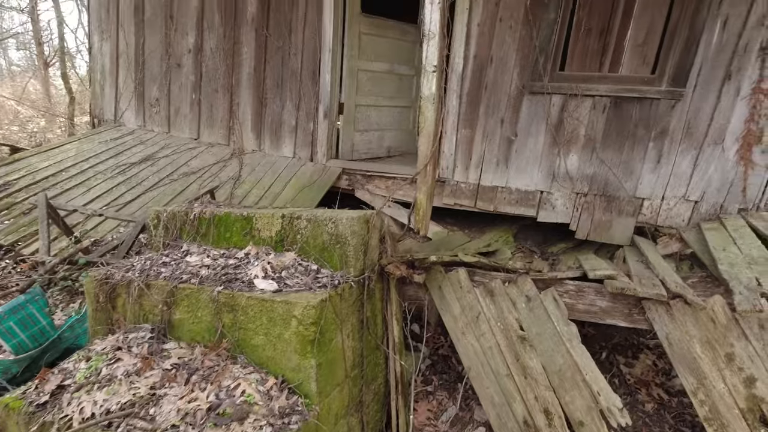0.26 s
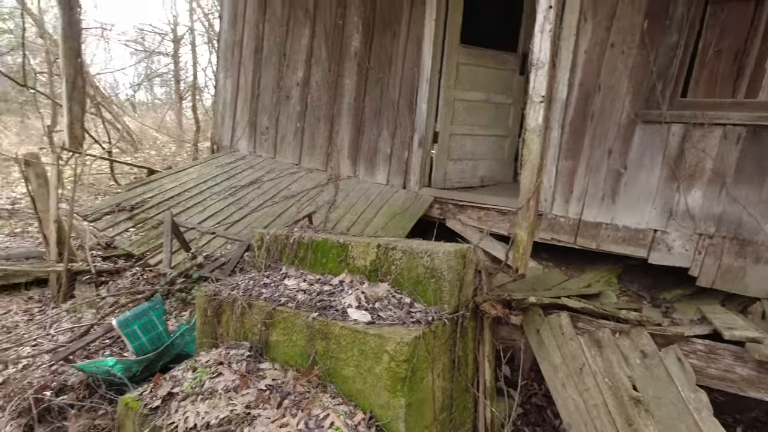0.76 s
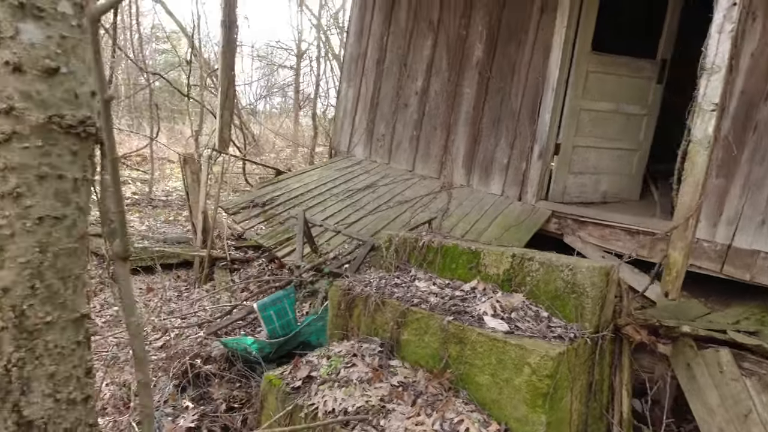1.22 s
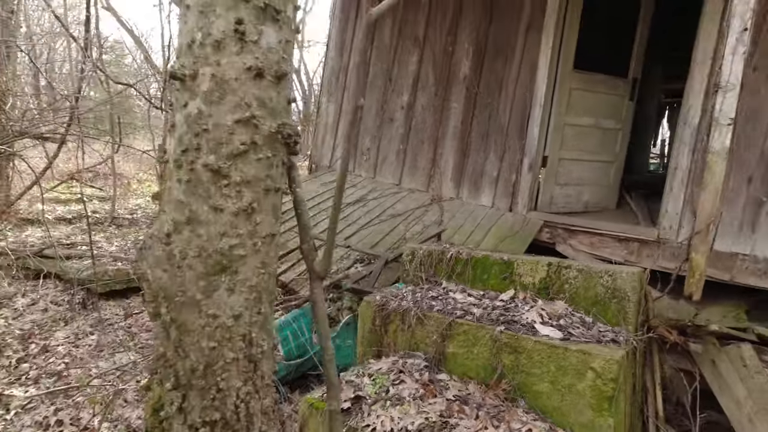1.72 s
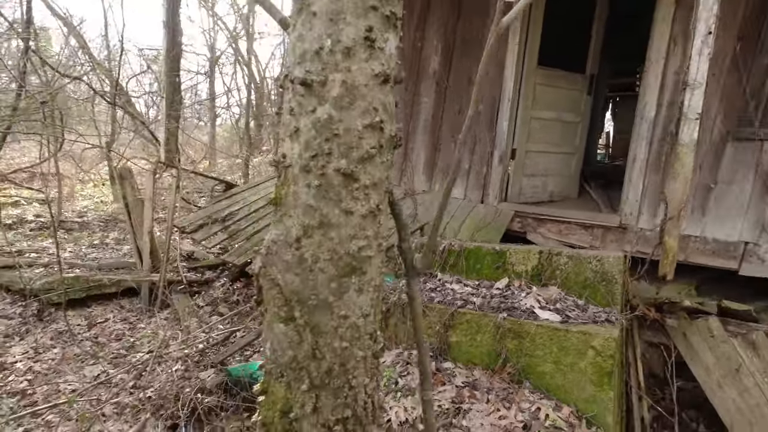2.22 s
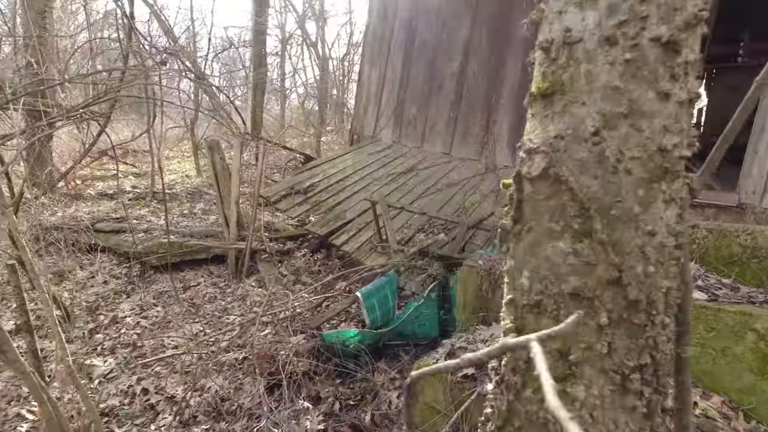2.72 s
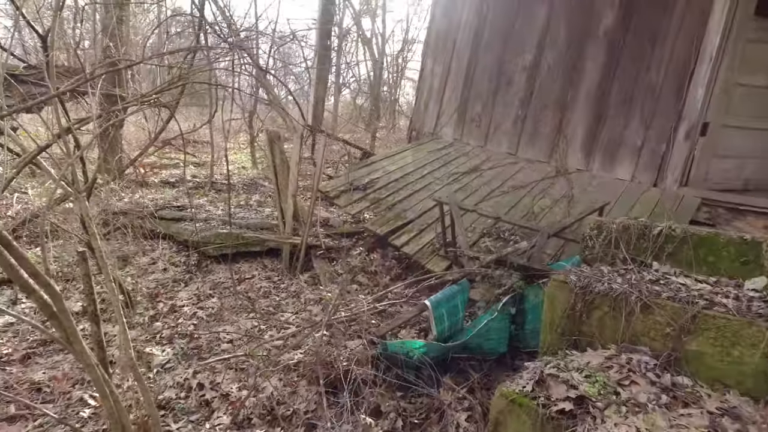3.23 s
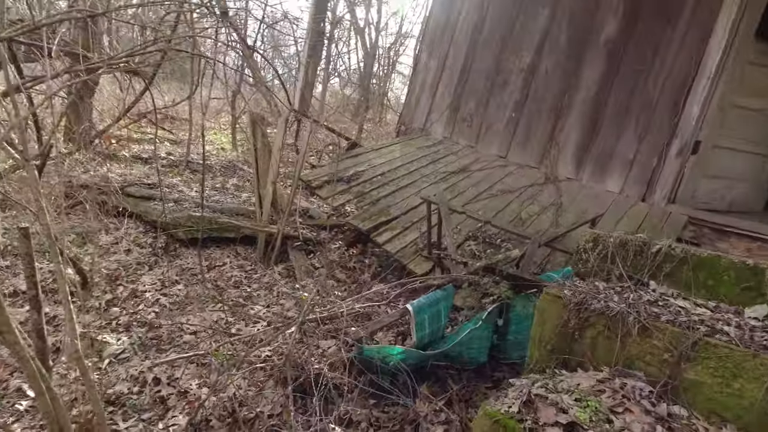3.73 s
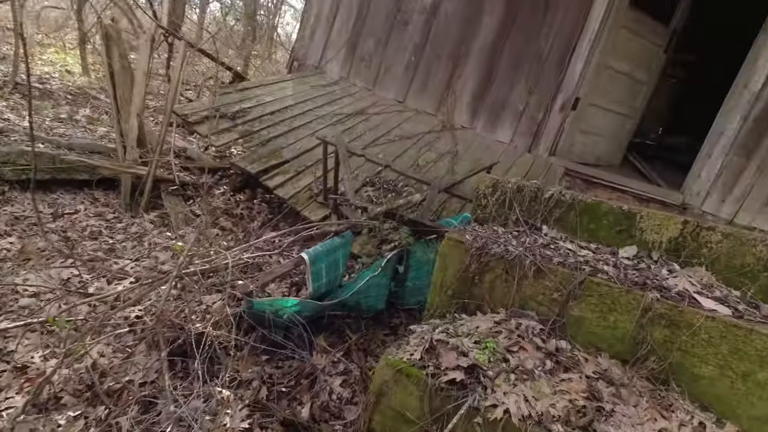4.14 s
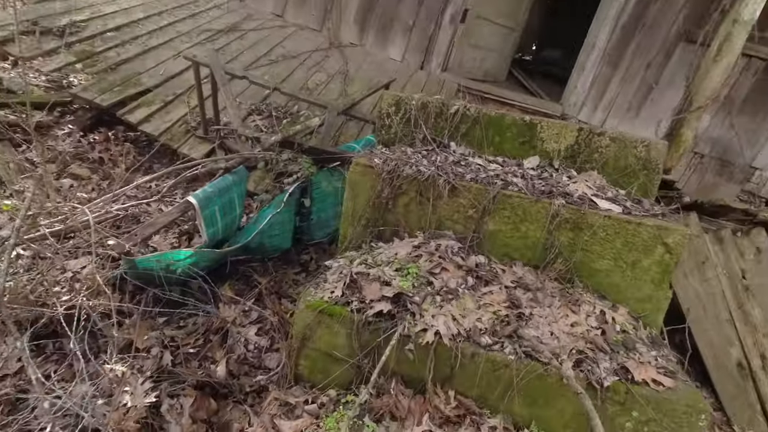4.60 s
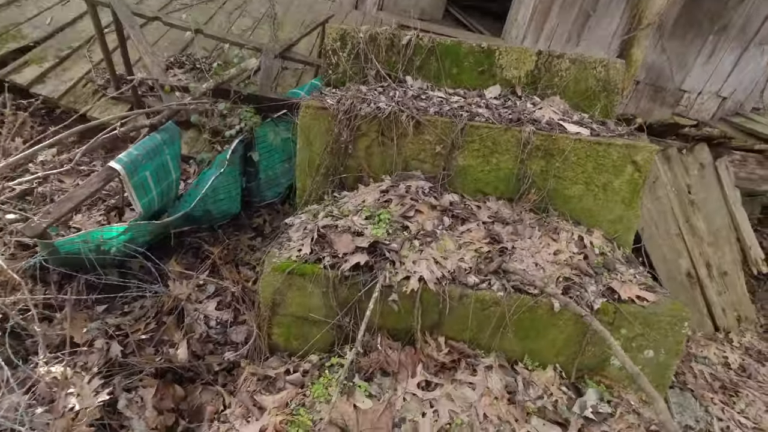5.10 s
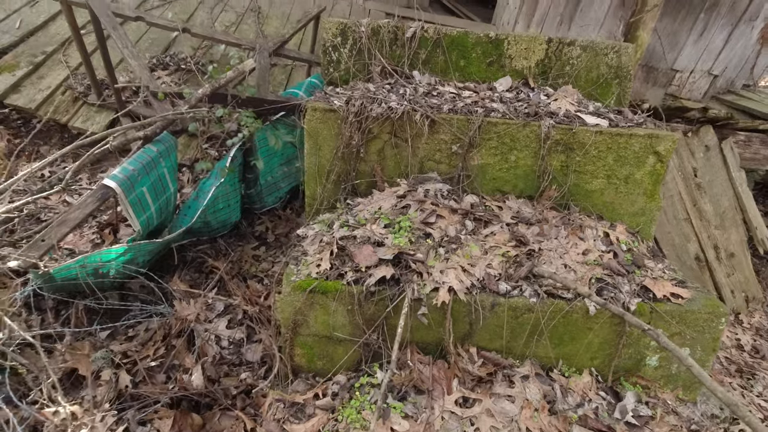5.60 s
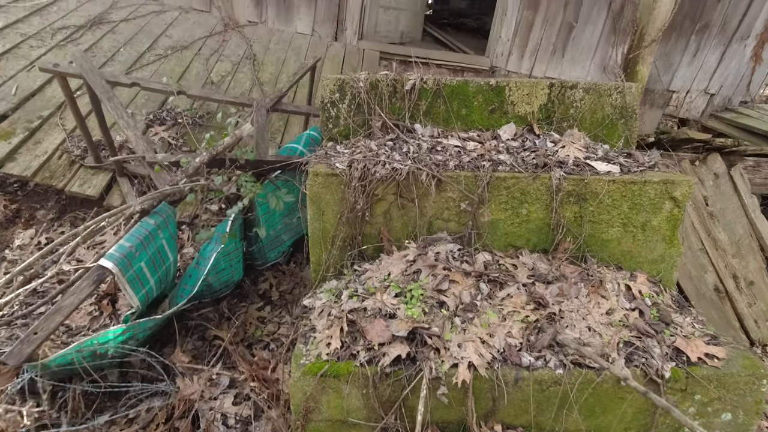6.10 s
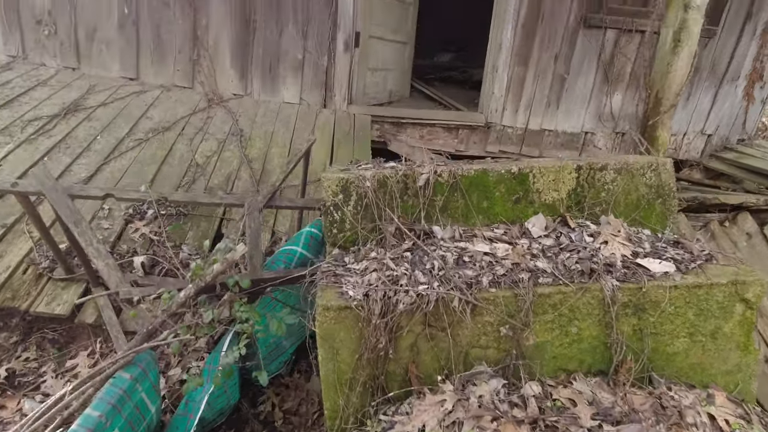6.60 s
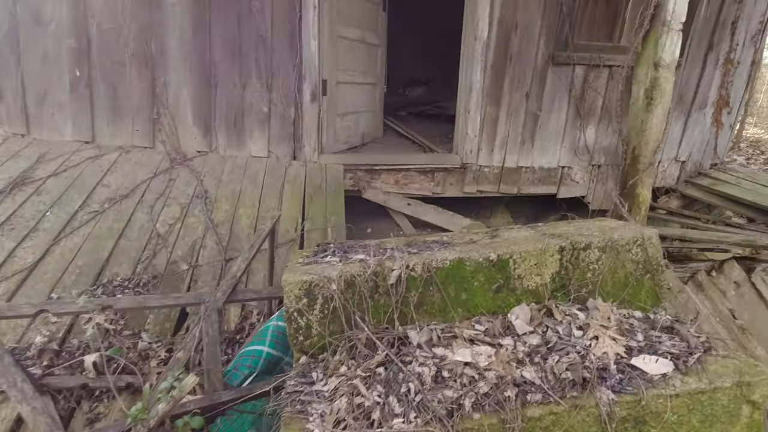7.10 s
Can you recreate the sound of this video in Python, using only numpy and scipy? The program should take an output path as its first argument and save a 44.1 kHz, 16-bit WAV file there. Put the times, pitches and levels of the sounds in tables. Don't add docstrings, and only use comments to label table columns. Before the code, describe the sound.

Footsteps crunch through dry leaves and snap twigs in a bare wood, a distant low engine drone fading, with bumps on the handheld microphone.

```python
import sys
import numpy as np
from scipy import signal
from scipy.io import wavfile
from scipy.ndimage import uniform_filter1d

SR = 44100
rng = np.random.default_rng(int(sys.argv[2]) if len(sys.argv) > 2 else 0)


def voltage_ratio(level):
    return 10 ** (np.asarray(level, float) / 20)


def int16_out(signal):
    q = np.round(np.clip(np.atleast_2d(signal).T, -1, 1) * 32767)
    wavfile.write(sys.argv[1], SR, q.astype(np.int16))


N = 324135

# frequency_hz, density_db (dB per Hz)
LEAF_SPECTRUM = [(200, -23), (350, -3.5), (600, -10), (1000, -4.5), (2000, -4.5), (4500, -5.5),
                 (6800, -2.5), (8500, -11.5), (12500, -23), (16000, -26.5)]


def evened(x):
    return x / np.sqrt(np.mean(x ** 2) + 1e-20)


def peak_one(x):
    return x / abs(x).max()


def column(rows, count):
    rows = np.array(rows)
    return np.interp(np.arange(N) / SR, rows[:, 0], rows[:, count])


def coloured(x, points):
    f, db = np.transpose(points)
    hz = abs(np.fft.fftfreq(4096, 1 / SR))
    log_gain = np.log(voltage_ratio(np.interp(np.log(hz + 1), np.log(f + 1), db)))
    taps = np.fft.ifft(np.exp(np.conj(signal.hilbert(log_gain)))).real
    if abs(taps[:64]).sum() <= abs(taps[-64:]).sum():
        taps = np.roll(taps[::-1], 1)
    return signal.oaconvolve(x, taps[:2048])[:len(x)]


def band(x, lo_hz, hi_hz):
    hi_hz = max(min(hi_hz, .45 * SR), 1.1 * lo_hz)
    return signal.sosfilt(signal.butter(2, [lo_hz, hi_hz], "band", fs=SR, output="sos"), x)


def drift(rate_hz):
    noise = rng.standard_normal(N + 2 * SR)
    return evened(signal.sosfilt(signal.butter(2, rate_hz, fs=SR, output="sos"), noise)[-N:])


def add(mix, s, sound):
    part = mix[round(s * SR):][:len(sound)]
    part += sound[:len(part)]


def patchy(x, depth_db, size=(14, 5)):
    z = signal.stft(x, nperseg=512, noverlap=384)[2]
    field = rng.standard_normal(z.shape[::-1])
    field = uniform_filter1d(field, size=size[0], axis=0)
    field = evened(uniform_filter1d(field, size=size[1], axis=1))
    return signal.istft(z * voltage_ratio(depth_db * field.T), nperseg=512, noverlap=384)[1][:len(x)]


def tent(s, db, rise_s, fall_s, hold_s=0):
    span_db = 20
    t = np.arange(0, N + 16, 16) / SR - s
    rising = t / max(rise_s, 1e-3)
    falling = (hold_s - t) / max(fall_s, 1e-3)
    return voltage_ratio(db + span_db * np.minimum(np.minimum(rising, falling), 0)) ** 2


def gain(power):
    return np.interp(np.arange(N) / 16, np.arange(len(power)), np.sqrt(power))


def engine(waver_db=3.5, weak_db=3):
    # start_s, fifth_db, eighth_db
    main_orders = [(0, -46.5, -62), (.5, -53, -54), (.95, -50, -69.5), (1.33, -47, -58.5),
                   (1.75, -42, -60.5), (2.1, -50, -63), (2.75, -42, -54.5), (3.15, -50, -64.5),
                   (3.5, -56.5, -59), (4.0, -49, -74), (4.25, -61, -60), (4.58, -64, -65), (5.0, -56, -62),
                   (5.8, -63, -59), (6.1, -64, -68.5), (6.45, -67, -54.5), (6.65, -63.5, -64.5),
                   (7.35, -62, -61.5)]
    # start_s, tenth_db, fifteenth_db
    overtones = [(0, -58, -70), (.7, -59, -74), (1.3, -68, -72), (2.2, -67, -76), (2.7, -62, -70),
                 (3.5, -72, -76), (4.1, -74, -72), (4.5, -72, -64), (5.0, -64, -76), (5.6, -65, -80),
                 (6.0, -76, -76), (6.7, -70, -72), (7.0, -66, -78), (7.35, -65, -64)]
    weak_orders = {3: -17.5, 4: -12, 6: -8.5, 7: -11, 13: -16.5}
    # frequency_hz, density_db (dB per Hz)
    air = [(30, -15), (60, -2), (150, -5.5), (230, -7.5), (400, -13.5), (800, -9.5), (1300, -14.5),
           (2200, -23), (4000, -35.5), (6500, -46), (9000, -47), (13000, -50), (14500, -76)]
    shaft_hz = 14.87
    near_db, far_db, fade_s = -54.5, -70.5, 3.93
    turn = 2 * np.pi * np.cumsum(shaft_hz * (1 + 0.00395 * drift(0.48))) / SR

    def order(k, blur=.63):
        phase = k * turn + 2 * np.pi * rng.random() + blur * drift(3.5)
        return np.sqrt(2) * np.sin(phase)

    fifth, eighth = voltage_ratio(column(main_orders, count=1)), voltage_ratio(column(main_orders, count=2))
    strong = fifth * order(5, blur=.3) + eighth * order(8, blur=.45)
    weak = sum(voltage_ratio(db + weak_db + waver_db * drift(1.22)) * order(round(k))
               for k, db in weak_orders.items())
    upper = voltage_ratio(column(overtones, count=1)) * order(10, blur=.5)
    upper += voltage_ratio(column(overtones, count=2)) * order(15, blur=.5)
    roar = patchy(coloured(rng.standard_normal(N), air), 1.46)
    fading_db = far_db + (near_db - far_db) * np.exp(-np.arange(N) / SR / fade_s)
    roar *= voltage_ratio(fading_db + .8 * drift(4)) / np.std(band(roar, 500, 1400))
    return strong + upper + fifth ** 0.31 * eighth ** 0.74 * weak + roar


def push():
    # start_s, hold_s, level_db, swing_hz
    jolts = [(0, 0.07, -43, 17), (.105, .08, -33, 11), (0.45, 0.045, -39, 16), (1.33, 0.19, -28, 9.8),
             (1.572, .09, -31, 10.5), (1.797, 0.21, -30, 9.4), (2.1, 0.36, -47, 30), (2.508, .13, -26, 10),
             (2.665, .07, -32, 13), (3.205, 0.25, -33, 8.3), (3.56, 0.28, -45, 8.2), (4.215, .05, -42, 14),
             (4.902, .15, -58, 12), (5.113, 0.075, -35, 10.5), (6.83, .07, -44, 10.5)]
    rise_s, fall_s = 0.028, 0.06
    calm_db, lumps_db, lead_cycles = -68, -11, .2
    lumps = band(band(rng.standard_normal(N), 14, 36), 10, 42)
    lumps /= np.sqrt(uniform_filter1d(lumps ** 2, size=7000) + 1e-12)
    t = np.arange(N) / SR
    powers = [tent(s + rise_s / 2, db, rise_s, fall_s, hold) for s, hold, db, hz in jolts]
    swing = np.zeros(N)
    for power, (s, hold, db, hz) in zip(powers, jolts):
        swing -= np.sqrt(2) * gain(power) * np.sin(2 * np.pi * (hz * (t - s) + lead_cycles))
    return swing + gain(voltage_ratio(lumps_db) ** 2 * sum(powers) + voltage_ratio(calm_db) ** 2) * lumps


def knocks():
    # start_s, peak_db, body_hz, t60_s
    blows = [(3.036, -32.5, 130, 0.045), (3.0588, -23, 180, .05), (3.0707, -16, 157, 0.069),
             (3.0771, -19, 168, 0.054), (3.1025, -12, 59, 0.03), (3.158, -34, 190, 0.04),
             (3.121, -36, 230, .06), (3.131, -37, 264, 0.054), (3.144, -35, 320, .05),
             (4.2445, -21.5, 99, 0.024), (4.242, -30, 335, 0.043), (4.262, -37.5, 231, 0.1),
             (4.075, -40, 296, 0.047), (4.952, -45, 382, 0.047), (5.0, -44, 75, .15), (2.53, -42, 160, .15),
             (2.64, -34, 377, 0.037)]
    # start_s, hold_s, level_db
    drags = [
        (3.033, .001, -46),
        (3.055, 0.025, -32.5),
        (3.104, .003, -35),
        (3.114, .03, -51),
        (3.135, 0.031, -48.5),
        (3.024, .01, -50.5),
    ]
    t, out = np.arange(8000) / SR, np.zeros(N)
    onset = 1 - np.exp(-(t / .002) ** 2)
    for s, db, hz, t60 in blows:
        ring = np.sin(2 * np.pi * hz * t) * voltage_ratio(-60 * t / t60) * onset
        add(out, s, -voltage_ratio(db) * peak_one(ring))
    muffled = [(150, -23), (400, 5.5), (900, -2.5), (1600, -12.5), (2600, -20.5), (5000, -52.0)]
    rub = coloured(rng.standard_normal(N), muffled)
    dragging = sum(tent(s, db, 0.0053, 0.0068, hold) for s, hold, db in drags)
    return out + gain(dragging) * evened(rub)


def twig_rings():
    # start_s, level_db, ring_hz, t60_s
    modes = [(4.9525, -30, 1000, 0.081), (5.4445, -38.5, 1330, 0.06), (.4705, -32, 500, 0.017),
             (4.243, -33, 520, 0.12), (4.0755, -40, 820, 0.044), (2.7337, -22, 810, .022),
             (4.9515, -21, 7900, .03), (4.9525, -25, 2500, .03), (4.478, -33, 5650, .05),
             (4.481, -33, 2620, .04), (4.2415, -25, 3150, .025), (.7068, -30, 1750, .012),
             (.2378, -33, 1900, .012), (6.345, -47, 1050, .08), (3.066, -32, 660, .05),
             (3.104, -34, 740, .04)]
    t, out = np.arange(4000) / SR, np.zeros(N)
    for s, db, hz, t60 in modes:
        add(out, s, voltage_ratio(db - 60 * t / t60) * np.sin(2 * np.pi * hz * t))
    return out


def fracture(hz, wood_db, fizz_db, ms, tone_db, spread, click=3.5):
    wood_hz, wood_ms, debris_db, debris_ms = 950, 1.47, -24, 12
    t = np.arange(4000) / SR
    splinter, thud, bits = rng.standard_normal((3, len(t)))
    ms = np.clip(ms, .3, 20)
    drive = splinter * (1 - np.exp(-t / 0.000067)) * np.exp(-1000 * t / ms)
    drive[4] += click * np.sign(thud[0]) * 2 / ms
    wide = peak_one(band(band(drive, 1430, 7730), 790, 11400))
    ring = peak_one(band(drive, hz / spread, hz * spread))
    crack = peak_one(wide + voltage_ratio(tone_db) * ring)
    fizz = peak_one(band(band(drive, 7160, 13400), 8500, 16700))
    thump = drive + thud * np.exp(-1000 * t / wood_ms)
    wood = peak_one(band(thump, 0.6 * wood_hz, 1.46 * wood_hz))
    debris = evened(coloured(bits * abs(thud), LEAF_SPECTRUM))
    debris *= np.exp(-1000 * t / debris_ms) * (1 - np.exp(-t / 0.00041))
    return crack + voltage_ratio(wood_db) * wood + voltage_ratio(fizz_db) * fizz + voltage_ratio(debris_db) * debris


def snaps():
    # start_s, peak_db, ring_hz, wood_db, length_ms
    twigs = [(.2378, -27, 3400, -4, 1.2), (.3201, -36.5, 6140, -3, 2), (.471, -21.5, 3160, -1, 0.27),
             (0.5635, -28.5, 6540, -8, 1.35), (0.707, -22.5, 3500, -5, 0.29), (1.4873, -39, 4970, 1, 2.8),
             (1.5032, -24, 4060, -7, 1.55), (1.511, -25, 6950, -7.5, 1.6), (1.5957, -27.5, 6100, -4, .79),
             (1.656, -17, 4200, -10.5, 1.44), (1.7847, -24.5, 2550, -8, 1.1), (2.6436, -24, 2850, -6, 1.2),
             (2.7334, -18.5, 4730, -6, 1.8), (2.752, -24.5, 2748, -7, 1.3),
             (3.362, -35.5, 2600, -0.5, 0.98), (3.3843, -33, 2700, -5, 1.6),
             (4.0747, -36.5, 2160, 9.5, 3.1), (4.2412, -19.5, 6200, -9, 2.2), (4.2451, -19.5, 3300, -8, 2),
             (4.2625, -26.5, 2360, -5, 2.9), (4.9547, -21, 2620, -10, 2.6), (4.9971, -30, 2080, -8, 2.6),
             (5.4437, -23.5, 1660, -10.5, 1.56), (6.305, -37, 3970, -1, 1.3)]
    # start_s, peak_db, ring_hz, fizz_db
    ticks = [(0.1079, -28, 6900, -6), (.279, -23, 3300, -28), (.6526, -29.5, 5800, -18),
             (0.674, -35, 5660, -22), (0.7331, -28.5, 4470, -8), (0.8533, -40.5, 7360, -15),
             (1.3495, -24, 4600, -30), (1.465, -31.5, 4900, -28), (1.5673, -22.5, 6600, -21),
             (1.8511, -21.5, 5600, -25), (1.9775, -20, 6600, -23), (2.7444, -18.5, 2740, -21),
             (2.8026, -26, 3820, -10), (2.8602, -33, 7400, -17), (2.9304, -20, 5200, -30),
             (2.9559, -25.5, 6550, -10), (3.2255, -34, 7650, -7), (4.111, -34, 4370, -13),
             (4.4522, -42, 5900, -15), (4.6324, -34.5, 4270, 0), (4.6818, -38, 7450, 9),
             (4.745, -33.5, 7700, 3), (4.8054, -40, 7500, 5), (4.9322, -30.5, 2310, -10),
             (4.9519, -11, 7500, -6), (5.1333, -25.5, 4530, -16), (5.173, -34, 3200, -17),
             (5.3719, -33, 7800, -1), (5.4212, -34, 7000, -10), (6.3144, -37, 6550, -39)]
    # start_s, peak_db, ring_hz, wood_db, length_ms
    tears = [(2.396, -52, 3720, -17, 7.5), (3.0455, -34, 5000, -15, 1.6), (4.163, -47, 5000, -10, 3.5),
             (2.875, -37, 4700, -15, 1.6), (5.458, -40, 4890, -10, 1.6), (4.016, -45, 6480, -5, 2.8),
             (5.4493, -38, 4400, -6, 2.5), (1.443, -46, 5400, -15, 1.7), (.0438, -42, 6960, -15, 1.5),
             (3.8484, -31, 3980, -14, 11), (4.4744, -29, 5500, -22, 9.3), (4.484, -23, 2820, -21, 2.5),
             (4.4927, -28, 3500, -20, 8.9), (4.5546, -33, 3400, -15, 3.4), (4.5789, -39.5, 2240, -7.5, 8.5),
             (5.4101, -37, 6100, -12, 4.5), (5.6885, -42, 4100, -15, 7), (5.6935, -45, 4400, -17, 7.6),
             (5.747, -42.5, 4400, -6, 4.9), (5.829, -43, 3300, -22, 8.1), (5.8336, -33.5, 4100, -29, 5.5),
             (5.9073, -57, 5600, 12, 4.8), (5.0098, -30, 3800, -20, .8), (5.4, -40, 6370, -16, 1.6),
             (5.262, -40, 6200, -15, 1.6)]
    # start_s, peak_db, ring_hz
    crackles = [(.2075, -41, 5500), (.2295, -38, 6800), (.393, -40, 6800), (.4595, -38, 6500),
                (1.3049, -50, 5000), (1.4194, -44, 7500), (1.5764, -32, 5260), (1.6194, -34, 3260),
                (1.7614, -38, 6000), (1.8284, -33, 6660), (1.8584, -35, 10800), (1.925, -25, 6780),
                (2.614, -38, 5490), (2.6614, -26, 5870), (2.7167, -26, 6100), (2.7674, -32, 2690),
                (2.8154, -33, 4350), (2.8354, -38, 6000), (2.9597, -29, 6910), (4.8504, -36, 6310),
                (5.1198, -40, 5200), (5.1504, -35, 4500), (5.1904, -40, 2070), (5.2144, -40, 5910),
                (6.0611, -55, 2400), (6.2028, -57, 2060), (6.4494, -43, 6310)]
    rows = []
    for s, db, hz, wood, ms in twigs:
        fizz = -14.5 + .8 * (db + 26.5)
        rows.append((s, db, hz, wood, fizz, ms, -5, 1.048 + .21 / (1 + ms)))
    rows += [(s, db, hz, -17.5, fizz, 1.43, 0.5, 1.35) for s, db, hz, fizz in ticks]
    rows += [(s, db, hz, wood, -10, ms, -5.0, 1.05 + .22 / (1 + ms)) for s, db, hz, wood, ms in tears]
    rows += [(s, db, hz, -20.0, -25, 1.1, 0.5, 1.35) for s, db, hz in crackles]
    out = np.zeros(N)
    for s, db, *settings in rows:
        add(out, s - .0004, voltage_ratio(db) * fracture(*settings))
    return out


def tread():
    # peak_s, level_db, rise_s, fall_s, dryness (-1 damp to 1 brittle)
    presses = [(0.0, -50, .1, 0.33, 0.28), (.1, -54, 0.17, 0.3, 0.65), (.27, -57.5, 0.27, 0.97, -0.04),
               (.722, -51, 0.32, 0.22, -.5), (1.501, -42, 0.058, 0.24, -0.086),
               (1.63, -48.5, .2, 0.24, -0.35), (1.925, -38, 0.082, 0.12, 0.081),
               (1.974, -36, 0.17, 0.059, 0.68), (2.1, -66, 0.09, 0.41, -0.29),
               (2.654, -37, 0.042, 0.26, 0.037), (2.735, -38.5, 0.093, 0.049, 0.44),
               (2.82, -62, .1, 0.28, .3), (2.945, -46, 0.14, 0.11, 0.8), (3.061, -52.5, 0.076, 0.16, -0.18),
               (3.297, -48.5, .22, 0.094, -0.049), (3.4, -54, .2, 0.26, -.2),
               (3.662, -61, 0.056, 0.29, 0.074), (3.985, -46.5, .12, 0.1, 0.06),
               (4.12, -59.5, .3, 0.82, -0.17), (4.92, -52, 0.45, .2, 0.51), (5.184, -52, 0.88, 0.19, 0.35),
               (5.36, -55.5, .6, 0.57, 0.7), (5.553, -45.5, .15, 0.16, 0.55), (7.348, -67, 0.22, .2, -.5)]
    # peak_s, level_db, rise_s, fall_s, dryness (-1 to 1)
    scuffs = [(2.61, -55, 0.17, .04, -0.27), (1.45, -60, 0.091, .05, -0.11),
              (5.9, -63.5, 0.046, 0.045, -.6), (6.31, -47.5, 0.018, 0.21, 0.12),
              (6.37, -47, 0.1, 0.15, -0.065), (6.43, -57, .1, 0.079, .2), (6.6, -67.5, .4, .4, 0),
              (6.791, -56.5, 0.24, .2, 0.099), (7.028, -49, 0.11, .1, 0.14), (7.1, -64, .1, 0.31, -0.047),
              (6.13, -67, .25, .25, .6), (7.31, -62, .015, .12, .1)]
    # start_s, level_db, fall_s, body_db, fizz_db
    bursts = [(.233, -45.5, 0.033, -10, -13), (0.471, -44, 0.055, -2.5, -13),
              (1.351, -54.5, 0.11, 3.5, -32), (1.787, -45.5, 0.4, -7.5, -21), (3.848, -46, 0.049, -23, -4),
              (4.241, -30.5, 0.021, -4, -18), (4.254, -42.5, 0.063, 3, -14), (4.474, -38, 0.096, -23, -8.5),
              (4.53, -51.5, .4, -11, -12), (4.953, -42, 0.19, -6, -10), (5.447, -43, 0.088, -9, -16),
              (5.693, -49, 0.039, -21, -3), (5.73, -58.5, 0.36, -19, -9), (5.836, -52, 0.075, -21, -15),
              (6.335, -68, .22, 4, 7.5), (7.005, -70, .14, -10, 8)]
    usual_body_db, usual_fizz_db, moss_fizz_db, rest_db = -6, -12, -18.5, -77

    def colour(dry):
        return usual_body_db - 12.5 * dry, usual_fizz_db + 5 * dry

    rows = [(*row, *colour(dry)) for *row, dry in presses]
    rows += [(*row, colour(dry)[0], colour(dry)[1] + moss_fizz_db) for *row, dry in scuffs]
    rows += [(s, db, .002, fall_s, body_db, fizz_db) for s, db, fall_s, body_db, fizz_db in bursts]
    power = sum(tent(*row) * voltage_ratio(np.array([[0], [body_db], [fizz_db]])) ** 2
                for *row, body_db, fizz_db in rows)
    rest = voltage_ratio(rest_db + np.array([[0], [usual_body_db], [usual_fizz_db]])) ** 2
    return np.array([gain(p) for p in power + rest])


def leaves(per_s=5000, spread_db=3.0, cycles=2.1, hiss=1.0, clump_db=2.2):
    size = voltage_ratio(spread_db * np.minimum(rng.exponential(1, N), 4)) * (rng.random(N) < per_s / SR)
    kind, t, grains = rng.integers(0, 24, N), np.arange(500) / SR, np.zeros(N)
    for k, hz in enumerate(np.geomspace(500, 15000, num=24)):
        envelope = np.exp(-t * hz / cycles) * (1 - np.exp(-t * hz))
        grain = np.sin(2 * np.pi * hz * t) * envelope * hz / 4000
        grains += signal.oaconvolve(size * (kind == k), grain)[:N]
    moss = np.clip((np.arange(N) / SR - 5.9) / .2, 0, .6)
    crush = (1 - moss) * evened(grains) + (hiss + .8 * moss) * rng.standard_normal(N)
    crush = coloured(crush, LEAF_SPECTRUM) * voltage_ratio(clump_db * drift(28))
    crush = patchy(crush, 2.4)
    body = signal.sosfiltfilt(signal.butter(4, 1350, fs=SR, output="sos"), crush)
    fizz = signal.sosfiltfilt(signal.butter(4, 9000, "high", fs=SR, output="sos"), crush)
    crackle = evened(crush - body - fizz)
    return (tread() * [crackle, evened(body), evened(fizz)]).sum(axis=0)


def scene():
    return (engine() + push() + knocks() + twig_rings() + snaps() + leaves())[None]


def spectral_gaps(x):
    # start_s, end_s, from_hz, to_hz, depth_db
    gaps = [(1.33, 1.375, 8000, 17000, -16), (1.425, 1.483, 9900, 17000, -20),
            (2.57, 2.63, 10500, 17000, -18), (5.97, 6.32, 13000, 17000, -20),
            (6.28, 6.325, 7800, 13000, -12), (6.31, 6.45, 10700, 13100, -24),
            (6.3, 6.56, 14900, 17000, -18), (6.5, 7.0, 12900, 17000, -20), (6.7, 6.99, 7800, 12900, -4),
            (7.07, 7.15, 8600, 11900, -8), (6.99, 7.07, 8600, 11900, -24), (7.15, 7.35, 13000, 17000, -18)]
    hz, t, z = signal.stft(x, SR, nperseg=1024)
    luck, mask = rng.random((len(gaps), len(hz))), np.ones(z.shape)
    for (start, end, lo_hz, hi_hz, db), lot in zip(gaps, luck):
        lost = (hz > lo_hz) & (hz < hi_hz) & (lot > .04)
        mask[..., lost[:, None] & (t > start) & (t < end)] *= voltage_ratio(db)
    return signal.istft(z * mask, SR, nperseg=1024)[1][:, :N]


def roll_off(x):
    return signal.sosfilt(signal.butter(12, 16790, fs=SR, output="sos"), x)


def record(dry):
    edge = signal.firwin(401, 16000, window=("kaiser", 7), fs=SR)
    mix = signal.oaconvolve(spectral_gaps(dry), edge[None], "same")
    return roll_off(mix)


dry = scene()
out = record(dry)
int16_out(out)
```